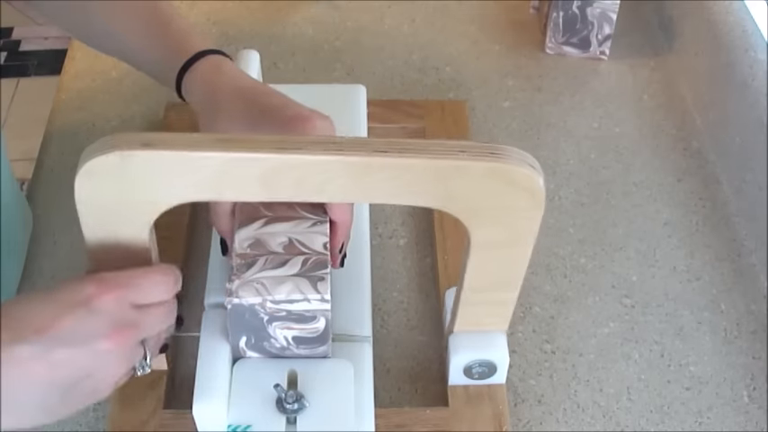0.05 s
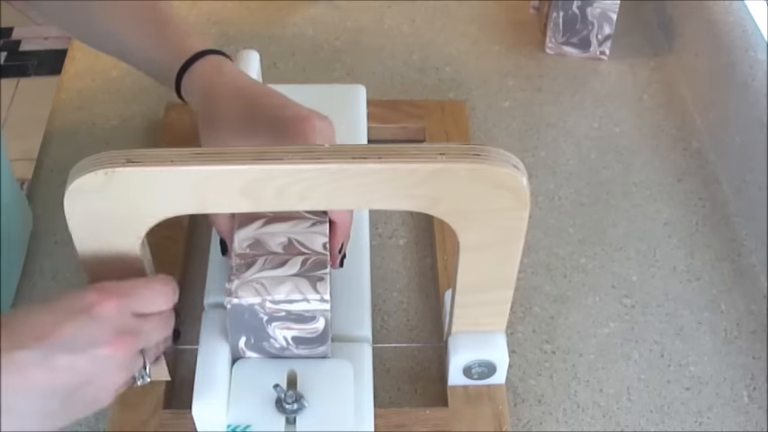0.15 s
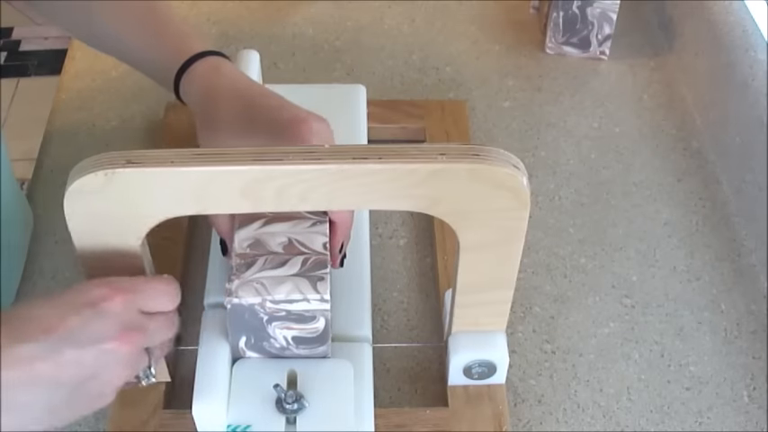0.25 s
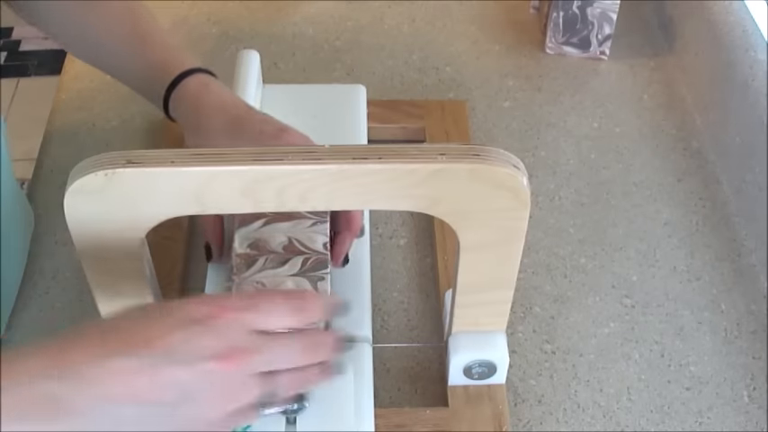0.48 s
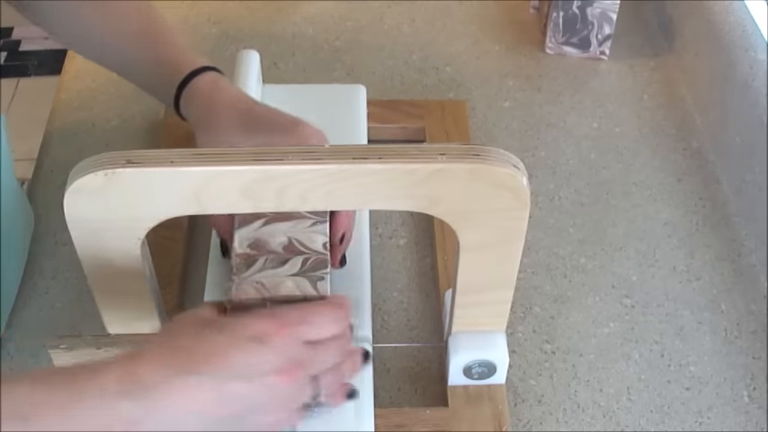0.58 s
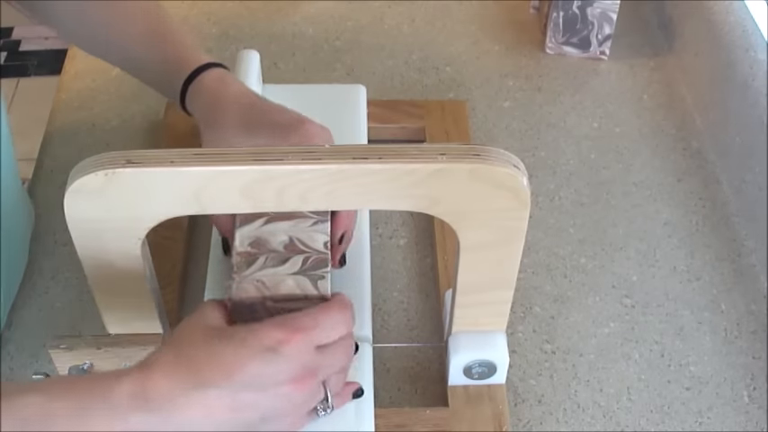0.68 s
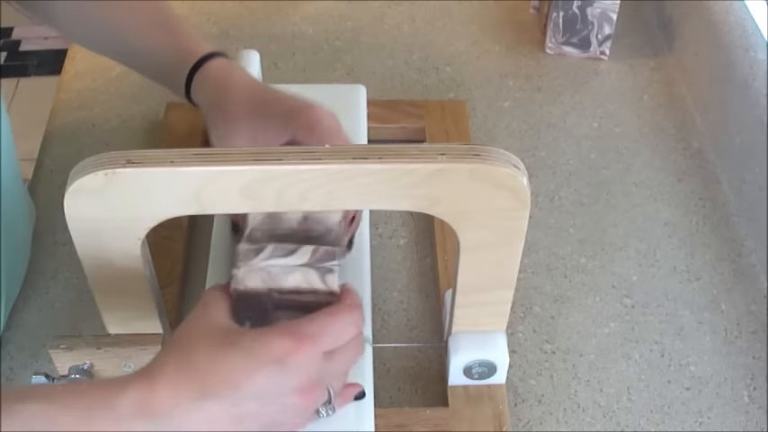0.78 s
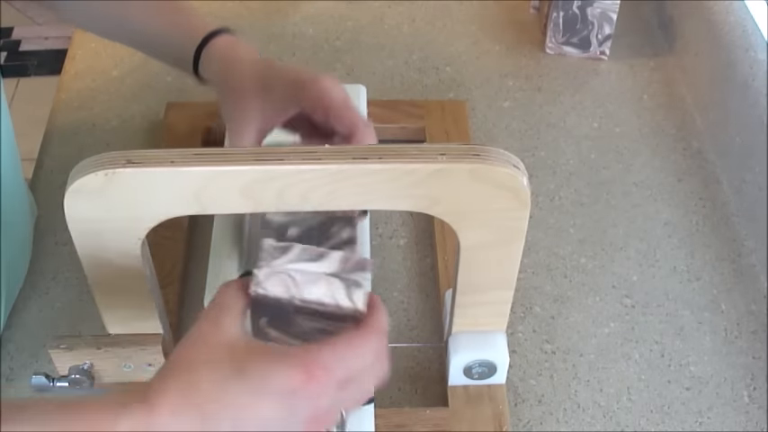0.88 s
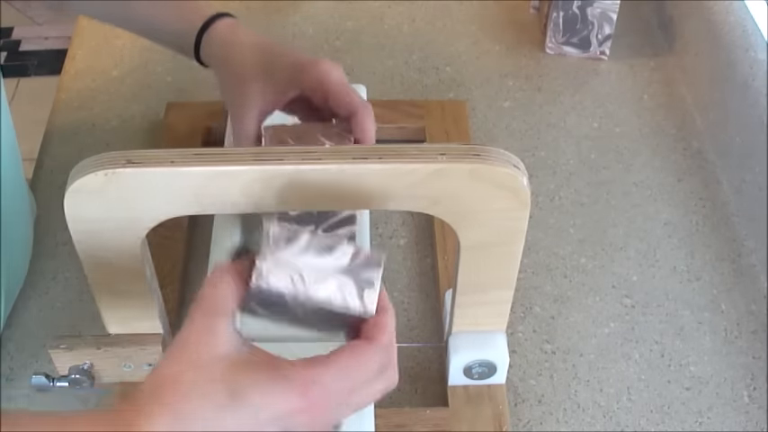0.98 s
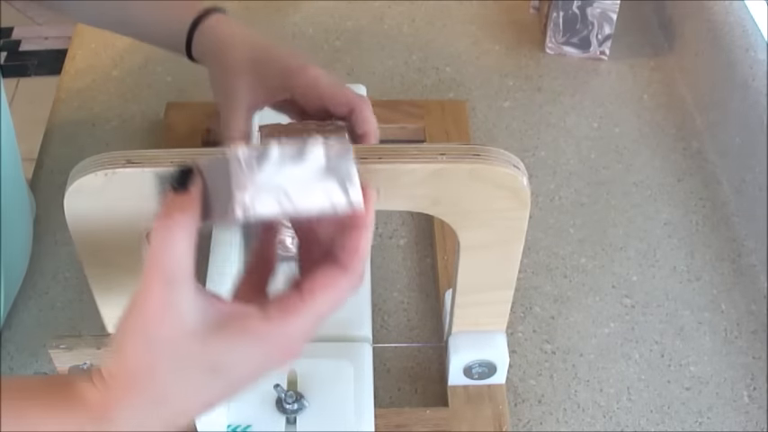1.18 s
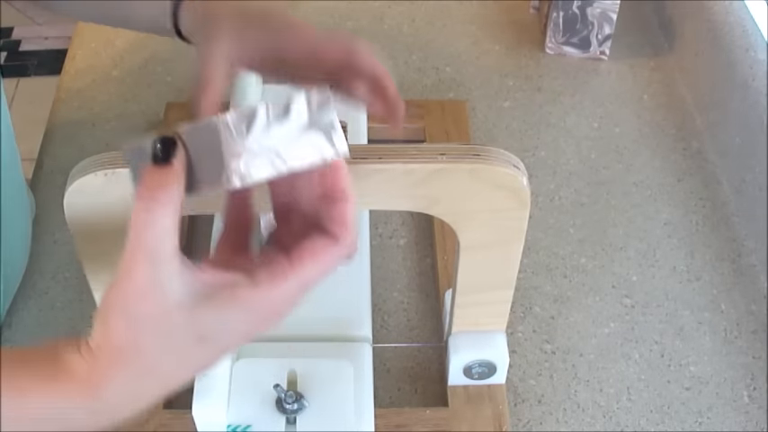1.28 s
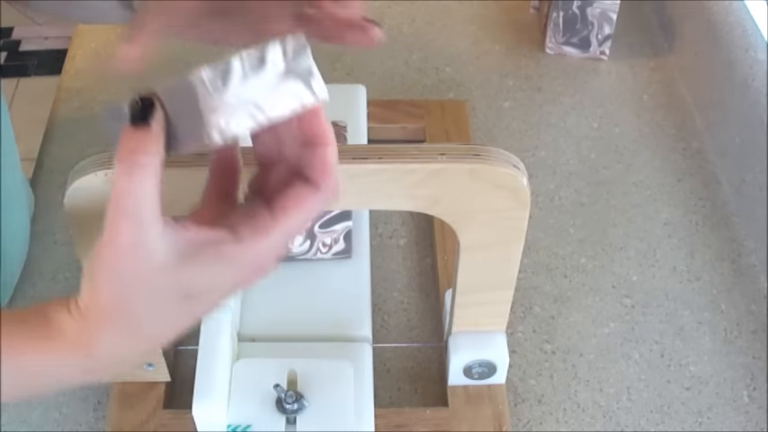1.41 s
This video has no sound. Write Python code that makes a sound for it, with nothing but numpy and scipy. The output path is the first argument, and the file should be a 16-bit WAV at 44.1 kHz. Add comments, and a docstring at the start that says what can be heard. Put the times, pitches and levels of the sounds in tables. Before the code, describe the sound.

A wooden-armed wire cutter snaps down with a hard clack and metallic rattle, then fades to quiet.

```python
"""A live room, a worktop, one microphone: a wooden-armed soap cutter snaps down on its base.
Fingers tick faintly on the soap over quiet room noise, and the wire tears out of the block as a noise burst.
Steel fittings touch (short modes and cracks) and chatter (random clicks), then the wood lands with one clack.
Frame and wire ring on as wavering sines; a low boom and noise fading band by band give worktop and room."""
import sys
import numpy as np
from scipy import signal
from scipy.fft import rfft, irfft
from scipy.io import wavfile

SR = 44100
rng = np.random.default_rng(int(sys.argv[2]) if len(sys.argv) > 2 else 0)


def pcm_store(signal):
    """Save signal as 16-bit PCM."""
    levels = np.round(np.clip(np.atleast_2d(signal), -1, 1) * 32767)
    wavfile.write(sys.argv[1], SR, levels.astype(np.int16).T)


N = 63945
T = np.arange(N) / SR  # seconds

# Every colour table gives relative power density; noise made from it has rms 1.
# Room noise colour: pitch_hz, level_db [dB per Hz]
ROOM_NOISE_COLOUR = [(25, 1), (60, -4), (110, -7), (170, -9), (300, 2), (500, -4.5), (1000, -6.5),
                     (2000, -12.5), (4000, -17), (8000, -22.5), (11000, -26)]
# Fingers on the soap: start_s, level_db
TICKS = [(0.0945, -42.5), (0.114, -46), (0.18, -51), (0.5795, -46.5), (1.2462, -43.5), (1.268, -57),
         (1.279, -51.5), (1.3132, -51.5), (1.351, -54), (1.418, -53)]
# Colour of the finger ticks: pitch_hz, level_db [dB per Hz]
TICK_COLOUR = [(300, -11), (1700, -5), (3000, -6), (4200, -1), (6000, 0), (8000, -4), (11000, -8)]
# Colour of the wire tearing through soap: pitch_hz, level_db [dB per Hz]
TEAR_COLOUR = [(30, -20), (100, -8), (600, -6.5), (1600, -9.5), (2600, -18), (11000, -23)]
# Touches of the steel fittings: start_s, level_db
STEEL_TOUCHES = [(0.2209, -10), (0.2227, 1.5), (0.2257, -12.5)]
# Modes of the fittings, relative to each touch: pitch_hz, level_db, t60_s
STEEL_MODES = [(673, -23, .06), (2250, -32, .03), (2503, -32, .05), (3601, -37, .12), (3932, -31, .11),
               (5270, -14, .02), (5728, -15, .023), (7208, -23, .029)]
# Colour of steel contact: pitch_hz, level_db [dB per Hz]
STEEL_COLOUR = [(30, -27), (100, -38), (350, -10), (700, 8.5), (1500, -4), (3000, 0), (5500, 0.5),
                (8000, -7), (11000, -12)]
# Rattles of the arm as it settles, relative to the clack: start_s, level_db
REBOUNDS = [(0.2666, -22), (0.2961, -21)]
# Colour of the wooden crack: pitch_hz, level_db [dB per Hz]
CLACK_COLOUR = [(40, -21), (200, -34), (700, -4), (3000, 20), (6000, 6), (11000, -8)]
# Damped modes of the arm, relative to each knock: pitch_hz, level_db, t60_s
ARM_MODES = [(606, -25.5, 0.029), (1302, -17, .02), (1760, -4.5, 0.0084), (2210, -15, 0.023),
             (2870, -4.5, 0.0083), (3460, 0.5, 0.0062), (4270, -16, .02), (6170, -21, 0.006),
             (7600, -23, 0.0038)]
# Colour of the clack's reverberation: pitch_hz, level_db [dB per Hz]
ROOM_COLOUR = [(40, 0), (90, -14), (160, -5.5), (260, -3.5), (380, -11.5), (560, 3.5), (750, -1.5),
               (1100, -0.5), (1800, 3.5), (2300, -7.5), (3000, 5.5), (3700, -2.5), (4600, -4), (6000, -15),
               (8000, -20), (11000, -34)]
# Late decay of the room: pitch_hz, t60_s
ROOM_T60 = [(100, .6), (300, 1), (700, 0.88), (1700, 0.86), (3200, 0.76), (5500, 0.78), (10000, 0.3)]
# Long modes of frame and taut wire, relative levels: pitch_hz, level_db, t60_s
FRAME_MODES = [(542, -30, .38), (611, -34, .38), (837, -38, .52), (940, -36, .45), (1203, -38, .45),
               (1314, -40, .48), (1495, -29, .35), (1664, -33, .48), (1708, -32, .62), (1752, -35, .4),
               (1909, -32, .32), (2512, -39, .36), (2726, -34, .35), (2806, -35, .4), (2864, -37, .5),
               (2908, -31, .38), (2960, -32, .4), (3106, -36, .4), (3252, -32, .4), (3375, -38, .45),
               (3454, -35, .38), (3731, -37, .42), (4054, -40, .45), (4414, -36, .38), (4517, -41, .42),
               (4872, -41, .45), (5006, -42, .4), (6336, -45, .38)]
# Dull thuds of the base on the worktop: start_s, pitch_hz, level_db
THUDS = [(0.292, 610, -23), (0.315, 642, -29.5), (0.327, 60.5, -43), (0.388, 158, -39)]

# Levels are in dB; _T60_S is the time to fall by 60 dB.
ROOM_NOISE_DB = -53.5
TICK_T60_S = 0.013
TEAR_START_S, TEAR_DB = 0.2, -49.5
STEEL_CRACK_DB, STEEL_CRACK_T60_S = -23, 0.015  # relative to each touch
CHATTER_START_S, CHATTER_PER_S = 0.2235, 6600  # mean click rate
CHATTER_DB, CHATTER_SPREAD_DB = -23, 2.5  # spread from click to click
CLACK_S = 0.2411  # the wood lands
PUSH_DB, PUSH_S = -14, 0.00015  # relative to each knock
CLACK_CRACK_DB, CLACK_CRACK_T60_S = -11, 0.0059  # relative to each knock
ROOM_DB, ROOM_BUILD_S, ROOM_HOLD_S = -27.5, 0.0021, 0.041
EARLY_DB, EARLY_HOLD_S, EARLY_T60_S = -26.5, 0.062, 0.4
FRAME_DB, FRAME_BUILD_S = 1, 0.012  # gain on the whole ring
FRAME_WAVER, FRAME_WAVER_HZ = 0.4, 18  # rms depth, width of the waver's spectrum
BOOM_HZ, BOOM_DB, BOOM_PEAK_S = 175.1, -27.5, 0.3033
BOOM_RISE_S, BOOM_T60_S = 0.02, 0.16
THUD_T60_S = 0.043
CLIP_TOP, MIC_LOW_CUT_HZ, CUTOFF_HZ = 0.44, 130, 11250


def from_db(db):
    """Decibels to gain."""
    return 10 ** (np.asarray(db) / 20)


def at_hz(points, hz):
    """Read a table on a log-frequency axis."""
    table_hz, values = np.transpose(points)
    return np.interp(np.log(np.maximum(hz, 1)), np.log(table_hz), values)


def colour_gain(points):
    """Gain per frequency bin that keeps the power of white noise."""
    hz = np.fft.rfftfreq(N, 1 / SR)
    gain = from_db(at_hz(points, hz)) * (hz < CUTOFF_HZ)
    return gain / np.sqrt(np.mean(gain ** 2))


def noise(points):
    """Coloured noise of rms 1."""
    return irfft(rfft(rng.standard_normal(N)) * colour_gain(points), N)


def decay(start, t60, hold=0):
    """Envelope that opens at start, holds and dies away exponentially."""
    fade_s = np.maximum(T - start - hold, 0)
    return (T >= start) * np.exp(-np.log(1000) * fade_s / t60)


def build(start, length):
    """Envelope that rises from start towards 1."""
    return 1 - np.exp(-np.maximum(T - start, 0) / length)


def ring(modes, start):
    """A body's modes after one blow, each a decaying sine."""
    out = 0
    for hz, db, t60 in modes:
        out = out + from_db(db) * decay(start, t60) * np.sin(2 * np.pi * hz * (T - start))
    return out


def room_noise():
    """Steady coloured noise of the quiet room."""
    return from_db(ROOM_NOISE_DB) * noise(ROOM_NOISE_COLOUR)


def finger_ticks():
    """Fingers on the soap: tiny contacts, each a fast-dying noise burst."""
    envelope = sum(from_db(db) * decay(s, TICK_T60_S) for s, db in TICKS)
    return envelope * noise(TICK_COLOUR)


def wire_tear():
    """The wire tears through the last of the soap: noise until the chatter starts."""
    tearing = (T > TEAR_START_S) * (T < CHATTER_START_S)
    return from_db(TEAR_DB) * tearing * noise(TEAR_COLOUR)


def steel_touches():
    """The fittings strike: each touch rings their modes and adds a noisy crack."""
    out = 0
    for s, db in STEEL_TOUCHES:
        crack = from_db(STEEL_CRACK_DB) * decay(s, STEEL_CRACK_T60_S) * noise(STEEL_COLOUR)
        out = out + from_db(db) * (ring(STEEL_MODES, s) + crack)
    return out


def steel_chatter():
    """The fittings chatter until the wood lands: dense random clicks coloured like steel."""
    happens = rng.random(N) < CHATTER_PER_S / SR
    sign = rng.choice([-1, 1], N)
    strength = from_db(CHATTER_SPREAD_DB * rng.standard_normal(N))
    clicks = happens * sign * strength
    chatter = irfft(rfft(clicks / clicks.std()) * colour_gain(STEEL_COLOUR), N)
    return from_db(CHATTER_DB) * chatter * (T > CHATTER_START_S) * (T < CLACK_S)


def clack():
    """The arm lands and rattles: each knock is a short push, a crack and the ring of wood."""
    out = 0
    for s, db in [(CLACK_S, 0)] + REBOUNDS:
        push = from_db(PUSH_DB) * np.sin(np.pi * np.clip((T - s) / PUSH_S, 0, 1))  # half a sine
        crack = from_db(CLACK_CRACK_DB) * decay(s, CLACK_CRACK_T60_S) * noise(CLACK_COLOUR)
        out = out + from_db(db) * (push + crack + ring(ARM_MODES, s))
    return out


def room():
    """Dense early reflections of the clack, then a tail whose bands die at their own rates."""
    hz = np.fft.rfftfreq(N, 1 / SR)
    spectrum = rfft(noise(ROOM_COLOUR))
    early = from_db(EARLY_DB) * decay(CLACK_S, EARLY_T60_S, EARLY_HOLD_S)
    edges_hz = np.geomspace(20, 12000, 20)
    out = 0
    for low, high in zip(edges_hz, edges_hz[1:]):
        band = irfft(spectrum * (hz >= low) * (hz < high), N)
        t60 = at_hz(ROOM_T60, np.sqrt(low * high))
        late = from_db(ROOM_DB) * decay(CLACK_S, t60, ROOM_HOLD_S)
        out = out + band * np.hypot(late, early)  # powers add
    return out * build(CLACK_S, ROOM_BUILD_S)


def frame():
    """Frame and wire ring on; each mode wavers on its way through the room."""
    hz = np.fft.fftfreq(N, 1 / SR)
    smooth = np.exp(-0.5 * (hz / FRAME_WAVER_HZ) ** 2)
    out = 0
    for mode_hz, db, t60 in FRAME_MODES:
        # slow complex noise of rms 1 moves both level and phase
        waver = np.fft.ifft(smooth * np.exp(2j * np.pi * rng.random(N)))
        waver = waver * N / np.sqrt(np.sum(smooth ** 2))
        carrier = np.exp(2j * np.pi * mode_hz * (T - CLACK_S))
        tone = np.imag((1 + FRAME_WAVER * waver) * carrier)
        out = out + from_db(db) * decay(CLACK_S, t60) * tone
    out = out / np.hypot(1, FRAME_WAVER)  # the waver adds no mean power
    return from_db(FRAME_DB) * out * build(CLACK_S, FRAME_BUILD_S)


def worktop_boom():
    """One low resonance of the worktop swells after the blow and fades."""
    swell = np.exp(np.minimum(T - BOOM_PEAK_S, 0) / BOOM_RISE_S)
    fade = decay(CLACK_S, BOOM_T60_S, BOOM_PEAK_S - CLACK_S)
    return from_db(BOOM_DB) * swell * fade * np.sin(2 * np.pi * BOOM_HZ * (T - CLACK_S))


def thuds():
    """The base thuds dully on the worktop: one short mode per thud."""
    return sum(ring([(hz, db, THUD_T60_S)], s) for s, hz, db in THUDS)


def scene():
    """All sources at one microphone."""
    handling = room_noise() + finger_ticks() + wire_tear()
    snap = steel_touches() + steel_chatter() + clack()
    after = room() + frame() + worktop_boom() + thuds()
    return (handling + snap + after)[None]  # one channel


def record(dry):
    """The microphone chain rounds the peaks, then cuts the deep bass and the top."""
    rounded = CLIP_TOP * np.tanh(dry / CLIP_TOP)
    high_pass = signal.butter(2, MIC_LOW_CUT_HZ, "high", fs=SR, output="sos")
    low_pass = signal.ellip(12, 0.2, 70, CUTOFF_HZ, fs=SR, output="sos")  # ripple, stopband in dB
    return signal.sosfilt(np.vstack([high_pass, low_pass]), rounded)


dry = scene()
out = record(dry)
pcm_store(out)
```